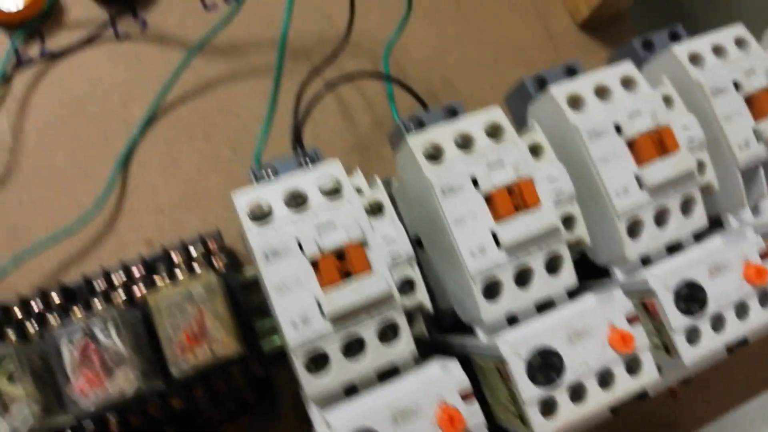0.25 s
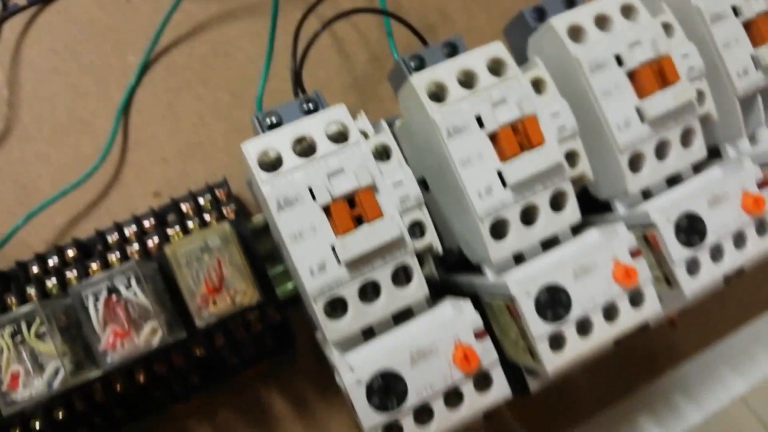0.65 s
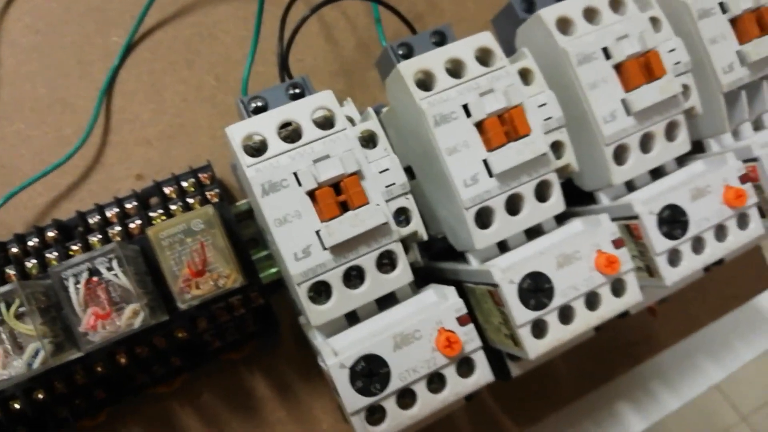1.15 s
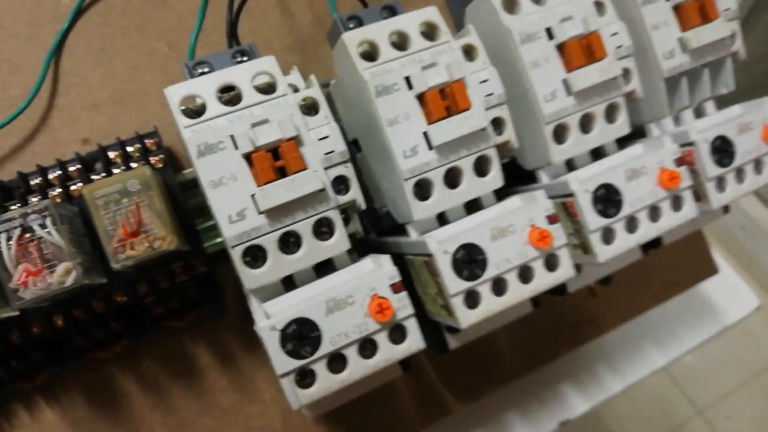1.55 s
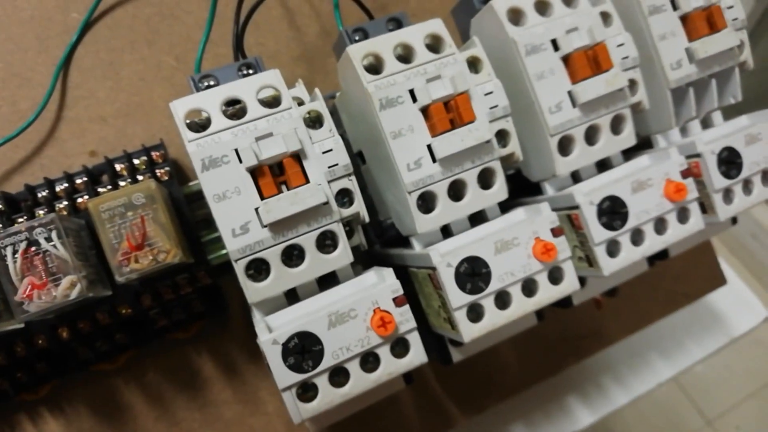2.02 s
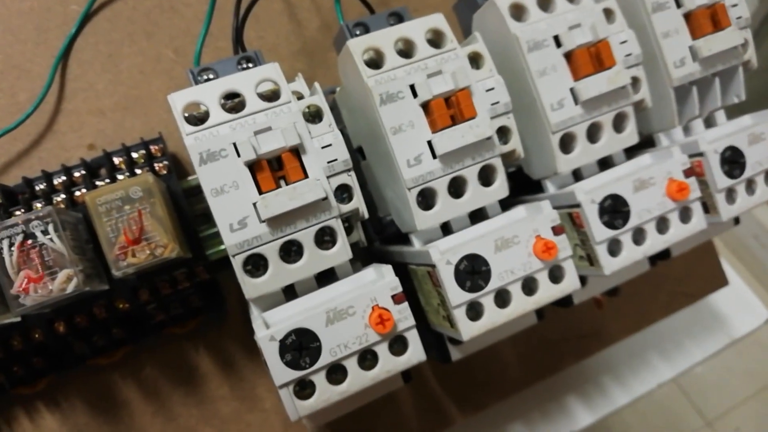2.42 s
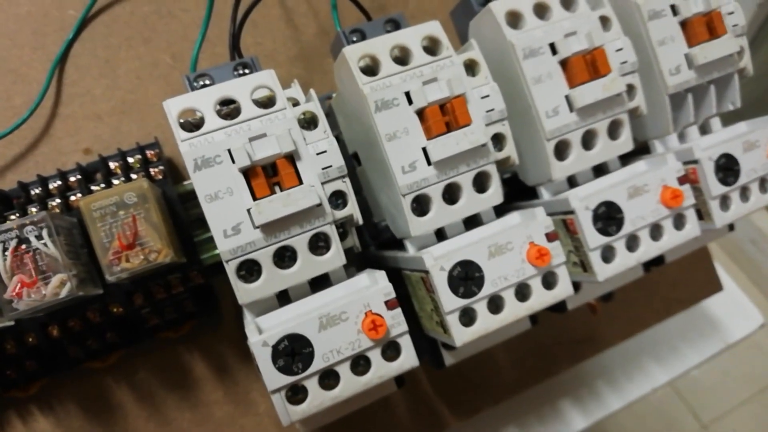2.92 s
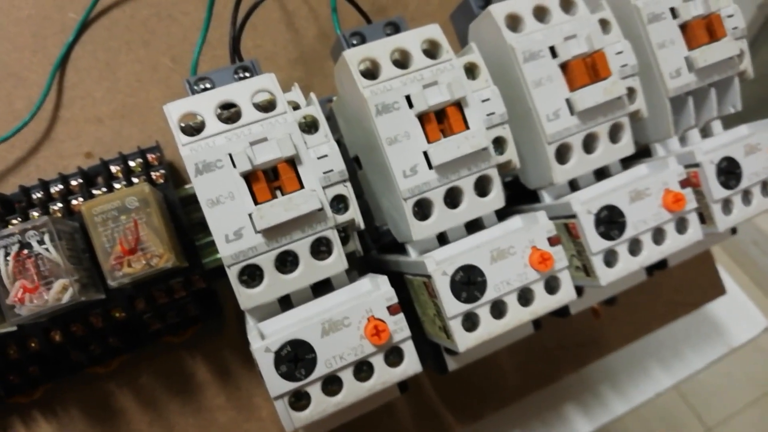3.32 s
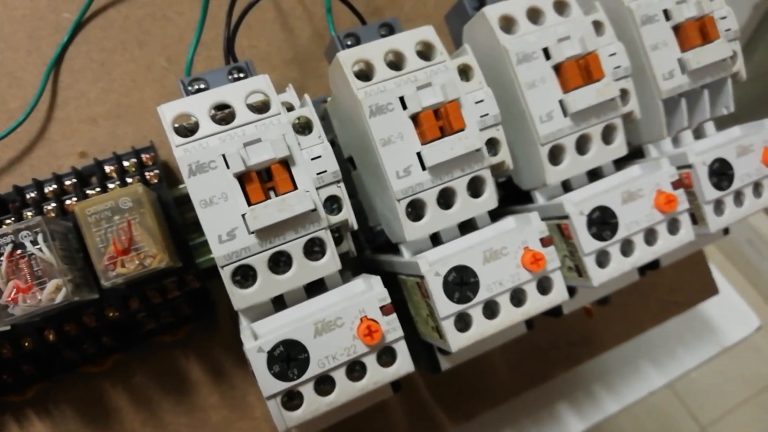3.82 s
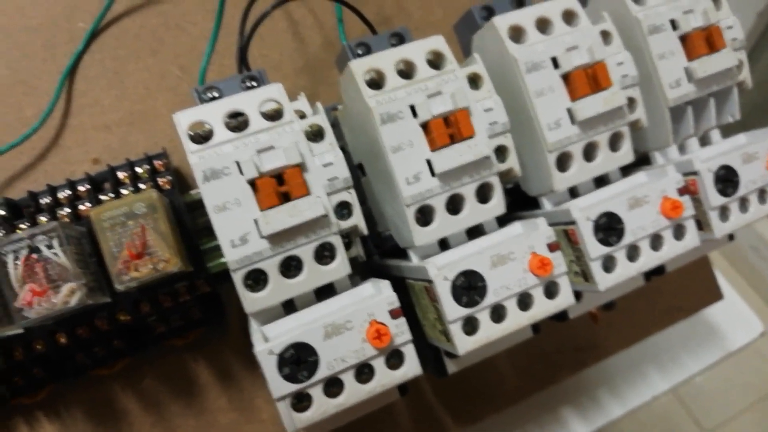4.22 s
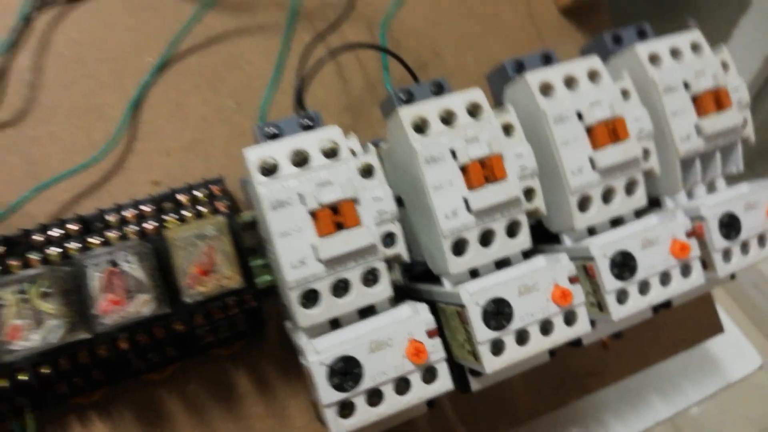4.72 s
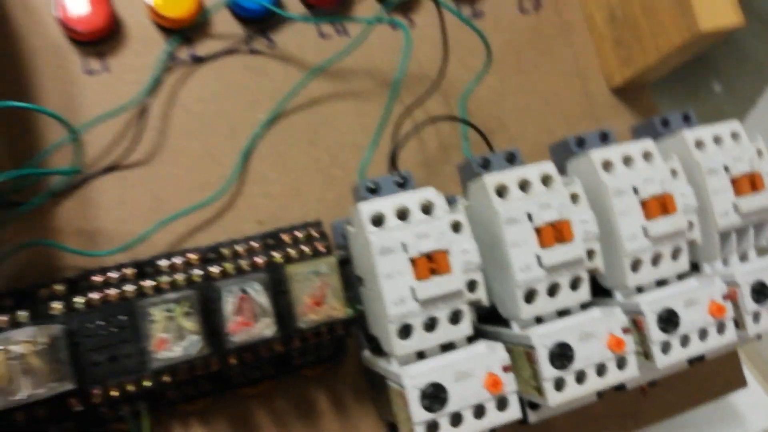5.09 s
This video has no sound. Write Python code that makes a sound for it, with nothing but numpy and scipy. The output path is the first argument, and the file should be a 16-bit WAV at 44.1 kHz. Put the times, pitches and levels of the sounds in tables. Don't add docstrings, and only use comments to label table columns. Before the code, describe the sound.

A row of magnetic contactors on a wooden board clacks five times, roughly one second apart at first, then closer together. Each is a hard, bright cluster of metal and plastic strikes ringing into a small reflective room. Small relays tick between them, and a sleeve brushes the close handheld microphone. Low fan noise continues underneath, dipping briefly after each clack.

```python
import sys
import numpy as np
from scipy import signal
from scipy.io import wavfile
from scipy.ndimage import uniform_filter1d

SR = 44100
rng = np.random.default_rng(int(sys.argv[2]) if len(sys.argv) > 2 else 0)


def makeup_ratio(level_db):
    decades = np.asarray(level_db, float) / 20
    return 10 ** decades


def unload_wav(signal):
    wavfile.write(
        sys.argv[1],
        SR,
        np.round(np.clip(np.atleast_2d(signal).T, -1, 1) * 32767).astype(np.int16),
    )


N = 235919

# (frequency [Hz], level difference [dB])
ROOM_LEAN = [(60, 0), (150, -0.5), (380, 2.5), (950, 1), (2380, 10.5), (5980, 7.5), (15000, -4.5)]


def evened(x):
    return x / np.sqrt(np.mean(x ** 2) + 1e-20)


def read(points, hz):
    f, value = np.transpose(points)
    return np.interp(np.log(hz + 1), np.log(f + 1), value)


def add(mix, s, sound):
    part = mix[:, max(round(s * SR), 0):][:, :sound.shape[1]]
    part += sound[:, :part.shape[1]]


def resonate(x, hz, width):
    return signal.lfilter(*signal.iirpeak(hz, hz / width, SR), x)


def paired_noise(length, colour, lean, t60=None, size=512, patchy_db=0.):
    # (frequency [Hz], correlation [-1..1])
    likeness = [(60, 0.94), (150, 0.98), (380, 0.39), (950, 0.034), (2380, -0.2), (5980, -0.12),
                (15000, 0.018)]
    hop = size // 4
    overlap = size * 3 // 4
    frames, hz = length * 4 // size + 5, np.fft.rfftfreq(size, 1 / SR)
    a, b, c, d, patches = rng.standard_normal((frames, len(hz), 5)).T
    patches = uniform_filter1d(patches, size=8, axis=0)
    patches = evened(uniform_filter1d(patches, size=10, axis=1))

    same = np.clip(read(likeness, hz), -1, 1)[:, None]
    left = a + 1j * b
    right = same * left + np.sqrt(1 - same ** 2) * (c + 1j * d)
    side_db = read(lean, hz)[:, None] / 2
    level_db = read(colour, hz)[:, None] + patchy_db * patches + np.array([side_db, -side_db])
    z = np.array([left, right]) * makeup_ratio(level_db)
    steady = signal.istft(z, nperseg=size, noverlap=overlap)[1][:, :length]
    if t60 is None:
        return evened(steady)

    t = np.arange(frames) * hop / SR
    dying = z * makeup_ratio(-60 * t / np.maximum(read(t60, hz), .05)[:, None])
    tail = signal.istft(dying, nperseg=size, noverlap=overlap)[1][:, :length]
    return tail / np.sqrt(np.mean(steady ** 2))


def rings(modes, longest, rise_ms):
    t = np.arange(SR // 2) / SR
    ring = sum(makeup_ratio(db - 60 * t / min(t60, longest)) * np.sin(2 * np.pi * hz * t) for hz, db, t60 in modes)
    return ring * (1 - np.exp(-t * 1000 / rise_ms))


def room(colour, wall_ms=16.3, wall_db=3, before_db=-14):
    # (frequency [Hz], t60 [s])
    room_t60 = [(60, 0.23), (300, .45), (1000, 0.53), (3000, 0.53), (7000, 0.52), (11000, 0.43),
                (16000, 0.42)]
    ms = np.arange(SR * 7 // 10) / SR * 1000
    build = makeup_ratio(before_db) + (1 - makeup_ratio(before_db)) / (1 + np.exp(np.clip(wall_ms - 3 - ms, -50, 50)))
    wall = 1 + (makeup_ratio(wall_db) - 1) * np.exp(-((ms - wall_ms) / 0.28) ** 2)
    closing = makeup_ratio(-80 * np.maximum(ms / 1000 - .21, 0))
    onset = np.minimum(ms / 0.41, 1)
    diffuse = paired_noise(len(ms), colour, ROOM_LEAN, room_t60, size=1024)
    return diffuse * build * wall * closing * onset


def background():
    # (frequency [Hz], density [dB per Hz])
    air_colour = [(12, -43), (20, -6.5), (55, -4.5), (86, -8.5), (155, -2.5), (263, -4), (312, -9),
                  (646, -13.5), (743, -9), (1230, -14), (1540, -19.5), (1770, -12.5), (1980, -18.5),
                  (7190, -25.5), (16200, -38.5)]
    # (frequency [Hz], width [Hz], level [dB])
    fan_tones = [(51.8, 8.2, -67), (164.4, 1.2, -67), (325.2, 29, -57.5), (1196, 120, -69.5),
                 (2900, 230, -67.5)]
    # (on [s], off [s], frequency [Hz], level [dB])
    whine_spans = [
        (2.35, 3.12, 6939, -73),
        (4.04, 4.22, 6939, -72),
        (2.55, 3.12, 10411, -84),
        (4.5, 5.1, 10000, -84),
    ]
    air_db = -51.5
    t = np.arange(N) / SR
    air = makeup_ratio(air_db) * paired_noise(N, air_colour, ROOM_LEAN, size=2048, patchy_db=1.87)
    fan = sum(makeup_ratio(db) * evened(resonate(air, hz, width)) for hz, width, db in fan_tones)
    whine = 0
    for on, off, hz, db in whine_spans:
        powered = (t > on) * (t < off)
        whine = whine + makeup_ratio(db) * np.sqrt(2) * np.sin(2 * np.pi * hz * t) * powered
    return air + fan + whine * makeup_ratio([[3.], [-3.]])


def clicks(rows, t60, wet_db, echo_db, snap_db):
    wall_echo_s = .0128
    pan = makeup_ratio([[2.], [-2.]])
    mix = np.zeros((2, N))
    tail = room([(100, 0.0064), (16000, 0.062)], wall_db=3, before_db=-15)
    tail = tail / np.linalg.norm(tail[0])
    for s, db, long_hz, short_hz, short_db in rows:
        modes = [(long_hz, 0, t60), (short_hz, short_db, .38 * t60)]
        ring = rings(modes, 1, t60 * 22)[:3000]
        snap = resonate(rng.standard_normal(3000), 5200, 5400) * np.exp(-np.arange(3000) / SR / 0.0016)
        click = ring / abs(ring).max() + makeup_ratio(snap_db) * snap
        add(mix, s, makeup_ratio(db) * click * pan)
        add(mix, s + wall_echo_s, makeup_ratio(db + echo_db) * click * pan)
        add(mix, s, makeup_ratio(db + wet_db) * signal.fftconvolve(click[None], tail, axes=1))
    return mix


def relay_ticks():
    # (time [s], peak [dB], long ring [Hz], short ring [Hz], short ring level [dB])
    tick_rows = [
        (.028, -36.5, 2900, 1020, 3),
        (2.3365, -28, 1747, 2900, 4),
        (2.4733, -33.5, 1710, 3210, 4.5),
        (2.494, -27.5, 1710, 1010, 10),
        (2.4945, -28.5, 1780, 3020, 8),
        (4.033, -36, 1700, 2730, -1.5),
        (4.08, -41.5, 950, 3230, 7),
    ]
    return clicks(tick_rows, t60=.032, wet_db=-3.5, echo_db=-9, snap_db=-11)


def rustle():
    # (peak time [s], peak level [dB], swell [s])
    brushes = [(.062, -68.5, 0.13), (.36, -75, 0.19), (.41, -70, .02), (1.42, -61, 0.091),
               (1.63, -70, 0.061), (1.731, -57.5, 0.027), (4.04, -64.5, 0.023), (4.124, -75, 0.023),
               (4.79, -81.5, 0.028), (4.95, -78, .3), (5.158, -75.5, 0.14), (5.268, -71.5, 0.037)]
    # (frequency [Hz], density [dB per Hz])
    cloth_colour = [(880, -49), (1500, 1.5), (1780, -6.5), (2140, -14), (2620, -5), (4120, -14),
                    (9450, 1.5), (11200, -12.5), (15000, -40)]
    swell_depth_db, fade_db_per_s = 16, 139
    shuffle_s, shuffle_rise_s, shuffle_db = 5.11, .08, -58
    shuffle_hz, shuffle_width_hz = 2700, 1590
    t = np.arange(N) / SR
    level = 0
    for s, db, swell_s in brushes:
        drop_db = np.where(t < s, swell_depth_db * (s - t) / swell_s, fade_db_per_s * (t - s))
        level = level + makeup_ratio(db - drop_db)
    cloth = paired_noise(N, cloth_colour, ROOM_LEAN, size=256, patchy_db=2.5)
    shuffle = makeup_ratio(shuffle_db) * evened(resonate(cloth[:, ::-1], shuffle_hz, shuffle_width_hz))
    stepping = (1 + np.tanh((t - shuffle_s) / shuffle_rise_s)) / 2
    return makeup_ratio(12) * level * cloth + shuffle * stepping


def thin_snaps():
    # (time [s], peak [dB], long ring [Hz], short ring [Hz], short ring level [dB])
    snap_rows = [
        (.409, -51, 6060, 9400, 6),
        (1.719, -39, 5000, 9200, 8),
        (4.456, -28.5, 8400, 10600, -11.5),
        (5.27, -45, 7460, 10500, -2),
    ]
    return clicks(snap_rows, t60=.005, wet_db=-3, echo_db=-6, snap_db=-1)


def far_knocks():
    # (time [s], peak [dB], long ring [Hz], short ring [Hz], short ring level [dB])
    knock_rows = [
        (.534, -32.5, 1670, 2300, 9.9),
        (1.3015, -36, 2210, 2700, 6.8),
    ]
    return clicks(knock_rows, t60=.013, wet_db=6, echo_db=-6, snap_db=-17)


def strike(crack, db, hz, length_ms, pan_db):
    # (frequency [Hz], level difference [dB])
    strike_lean = [(60, 0), (500, 0), (1200, 1), (2500, 4), (5000, 3), (9000, -5), (12000, -2), (15000, 0)]
    ring_share_5khz, share_per_octave = 0.57, -.06
    clean_ring = .42
    ring_width = 0.14
    sag_db, grain_db = 1.5, 2
    linger_db, linger_ms = -15, 4.5
    ms = np.arange(700) / SR * 1000
    noise = paired_noise(3000, crack, strike_lean, size=512)
    broad = evened(0.5 * noise + resonate(noise, hz, 2.1 * hz))

    cycles = hz * np.arange(3000) / SR + rng.random() + np.array([[0], [.15]])
    mode = np.sqrt(2) * np.sin(2 * np.pi * cycles)
    ring = clean_ring * mode + (1 - clean_ring) * evened(resonate(noise, hz, ring_width * hz))
    share = np.clip(ring_share_5khz + share_per_octave * np.log2(hz / 5000), 0, 1)
    rattle = ((1 - share) * broad + share * ring)[:, -len(ms):]

    shape = np.minimum(ms / (.2 * length_ms), 1) * np.exp(-np.maximum(ms - length_ms, 0) / .6)
    grain = evened(uniform_filter1d(rng.standard_normal(len(ms)), size=14))
    shape = shape * makeup_ratio(grain_db * grain - sag_db * np.minimum(ms / length_ms, 1))
    shape = np.maximum(shape, makeup_ratio(linger_db) * np.exp(-ms / linger_ms) * (ms > length_ms))
    rattle = rattle / np.sqrt(np.mean((rattle * shape) ** 2) / np.mean(shape ** 2))
    return makeup_ratio(db + np.array([[pan_db], [-pan_db]]) / 2) * rattle * shape


def contactors(direct_db=3.74):
    # (time [s], level [dB], ring [Hz], length [ms], left-right [dB])
    clacks = [
        [(1.0105, -37, 9500, 2.2, 0), (1.0130, -9.5, 10200, 1.6, -1), (1.0146, -24, 5000, 1.4, 4)],
        [(1.9872, -23, 3500, 4, 0), (1.9925, -29, 330, 4, 0), (1.9980, -24, 10000, 2.4, 0),
         (2.0010, -10, 6000, 2.6, 0), (2.0040, -13, 5500, 1.3, 4)],
        [(3.1228, -24, 3500, 2.5, 0), (3.1258, -23, 9000, 1.6, 0), (3.1293, -19, 9000, 1.8, 0),
         (3.1328, -12, 5000, 1.2, 0), (3.1350, -10.5, 9000, 3.2, 0)],
        [(3.7000, -21, 3100, 3.6, 0), (3.7086, -12.5, 9000, 1.7, -2), (3.7105, -20, 3200, 3, 2),
         (3.7149, -11.5, 5000, 1.4, 0), (3.7164, -17, 7000, 2.4, 0)],
        [(4.2225, -26, 9000, 2.6, 0), (4.2250, -26, 3000, 4.5, 0), (4.2301, -15, 7500, 3.6, 0),
         (4.2372, -11.5, 8000, 2, 0), (4.2392, -13, 3000, 2, 5)],
    ]
    # (frequency [Hz], density [dB per Hz])
    cracks = [
        [(290, -40), (500, -25), (960, 0.5), (2260, -18), (2930, 7.5), (3920, -17), (5310, -1.5), (9220, -3.5),
         (10400, 6), (13100, -46), (15300, -8), (16000, -45)],
        [(180, -41), (300, -56), (1690, -5), (2790, 6), (3830, -7.5), (4830, 5.5), (6100, -9), (7690, 1.5),
         (10600, 3), (16000, -17.5)],
        [(180, -28.5), (300, -11.5), (842, -8), (2740, -5), (3950, -6.5), (4750, -3.5), (6300, -6.5),
         (9090, -11), (15000, -14.5), (16000, -52.5)],
        [(180, -45), (300, -18), (2280, -14.5), (3030, -10), (4090, -19), (4990, -11), (5800, -15.5),
         (9090, -9), (13500, -13.5), (16000, -27)],
        [(180, -33.5), (300, -9), (1580, 4.5), (1930, -8), (2840, -0.5), (3830, -5.5), (4750, 2.5), (5900, -5),
         (9880, -2), (16000, -3)],
    ]
    # (frequency [Hz], density [dB per Hz])
    tails = [
        [(290, -49), (500, -24.5), (545, -41), (855, -17), (1380, -19), (1670, -15.5), (2040, -18.5),
         (3390, -14), (7750, -7), (10400, -6), (14500, -33), (16000, -25)],
        [(30, -45), (45, -15.5), (215, -1), (372, -2.5), (529, -5), (646, -31), (831, -5), (1300, -15.5),
         (2320, -5.5), (10300, -7), (12500, -21), (16000, -31)],
        [(30, -42.5), (45, -13.5), (237, -15.5), (276, -25.5), (329, 6), (433, -45), (529, -16.5), (715, -27),
         (1300, -20), (6330, -18.5), (9220, -13.5), (16000, -32)],
        [(30, -47), (45, 2), (176, -43.5), (237, -2.5), (433, -17.5), (646, -22), (810, -4.5), (990, -12.5),
         (1590, -10), (5180, -16.5), (8990, -17), (16000, -27.5)],
        [(30, -48), (45, -14), (237, -0.5), (529, -4), (646, -21), (810, -1), (965, -11), (1040, -4.5),
         (3380, -8), (8550, -16.5), (14100, -20.5), (16000, -43)],
    ]
    # (frequency [Hz], width [Hz], level [dB])
    casings = [
        [(3390, 110, 3), (5890, 60, 3), (8140, 200, -16)],
        [(3500, 270, -1.5), (5000, 160, 1), (5620, 210, 7.5)],
        [(3300, 780, 1), (4460, 300, 2.5), (9700, 1200, -2)],
        [(2900, 360, -2.5), (3420, 1300, -5.5), (9200, 710, 0)],
        [(2900, 270, 4), (6400, 170, -10), (8900, 1600, 4.5)],
    ]
    # (frequency [Hz], level [dB], t60 [s])
    boards = [
        [(992, 1, 0.017), (1700, -3.5, 0.02), (2900, -4, 0.018)],
        [(67.4, -20, 0.025), (131.5, -15, 0.45), (198, 4, 0.035), (288, -25, 0.051), (313, -6.5, 0.8),
         (823, -16, 0.5)],
        [(70, -6, 0.13), (141, -34, 0.17), (232, -4, 0.37), (320, -6.5, 0.78), (784, -18, 0.52),
         (935, -15.5, 0.091)],
        [(59.7, -3.5, 0.05), (234, -8, 0.6), (331, -9.5, 0.49), (823, -25, 0.65), (927, -2.5, 0.15)],
        [(66.5, 0, 0.12), (226, -36, .2), (244, 5.5, 0.38), (323, -1.5, 0.74), (440, -0.5, 0.18),
         (817, -7.5, 0.74), (940, -6, 0.19)],
    ]
    # (armature seats [s], room level [dB], board level [dB])
    strengths = [
        (1.0125, -10.5, -18),
        (2.0028, -13, -19),
        (3.1316, -12.5, -21),
        (3.715, -12.5, -20),
        (4.237, -13.5, -23),
    ]
    longest_ring_s, low_cut_hz = 0.52, 31
    mix = np.zeros((2, N))
    for rows, crack, colour, casing, modes, strength in zip(clacks, cracks, tails, casings, boards, strengths):
        seat_s, room_db, board_db = strength
        for s, *blow in rows:
            add(mix, s, makeup_ratio(direct_db) * strike(crack, *blow))
        tail = makeup_ratio(room_db) * room(colour)
        tail = tail + sum(makeup_ratio(db) * resonate(tail, hz, width) for hz, width, db in casing)
        add(mix, seat_s - .002, tail)
        add(mix, seat_s, makeup_ratio(board_db) * rings(modes, longest_ring_s, 0.89) * np.ones((2, 1)))
    return signal.sosfilt(signal.butter(2, low_cut_hz, "high", fs=SR, output="sos"), mix)


def scene():
    return background() + relay_ticks() + rustle() + thin_snaps() + far_knocks() + contactors()


def top_cut(x):
    return signal.sosfilt(signal.butter(12, 16360, fs=SR, output="sos"), x)


def record(dry):
    threshold_db, duck_db, climb_db_per_s = -14, 10.5, 48.
    reaction_s, smoothing_s = .0095, .003
    edge_hz = 16200
    loud = uniform_filter1d((dry ** 2).mean(0), size=100) > makeup_ratio(threshold_db) ** 2
    climb_db = np.arange(N) * climb_db_per_s / SR
    held_db = np.maximum.accumulate(np.where(loud, duck_db, -99) + climb_db)
    over_db = np.roll(np.maximum(held_db - climb_db, 0), round(reaction_s * SR))
    slow = np.exp(-1 / (SR * smoothing_s))
    over_db = signal.lfilter([1 - slow], [1, -slow], over_db)
    ducked = np.clip(dry / makeup_ratio(over_db), -.98, .98)
    edge = signal.firwin(101, edge_hz, fs=SR)
    mix = signal.oaconvolve(ducked, edge[None], "same")
    return top_cut(mix)


dry = scene()
out = record(dry)
unload_wav(out)
```